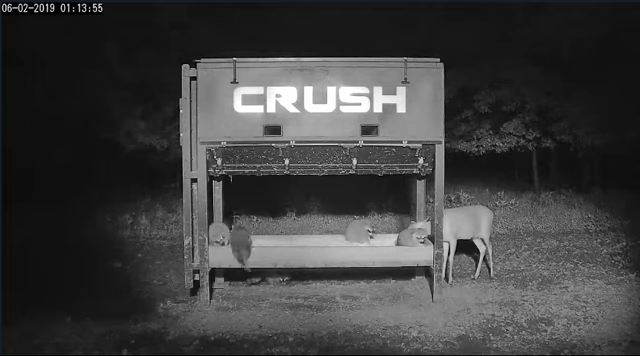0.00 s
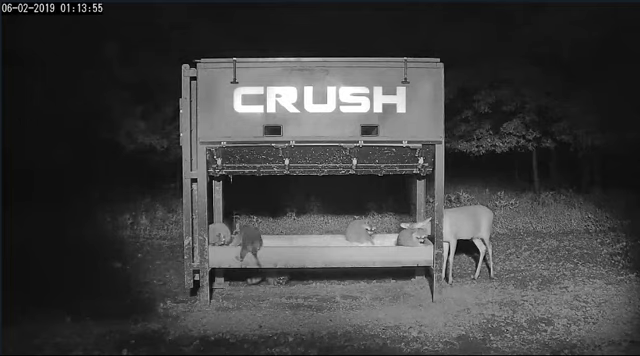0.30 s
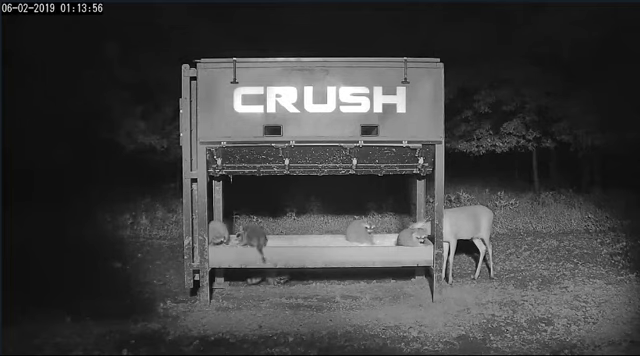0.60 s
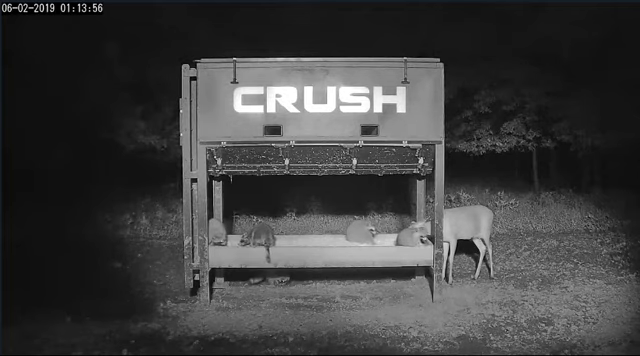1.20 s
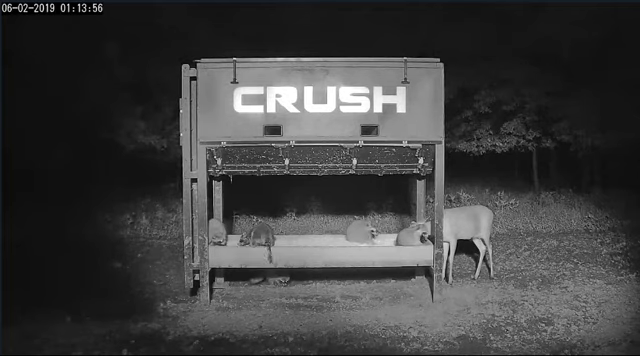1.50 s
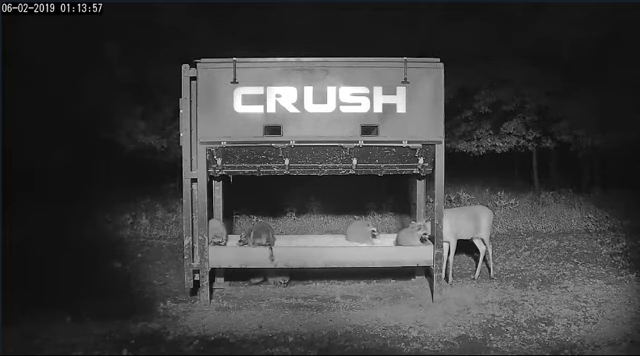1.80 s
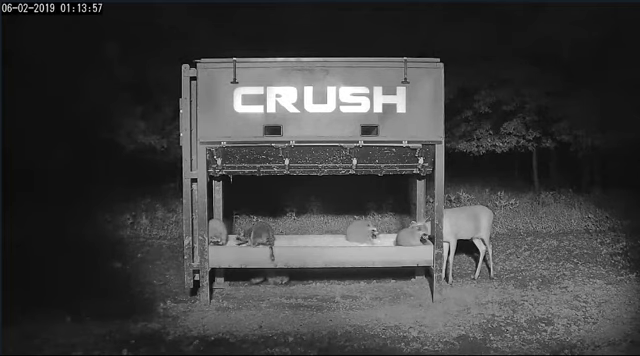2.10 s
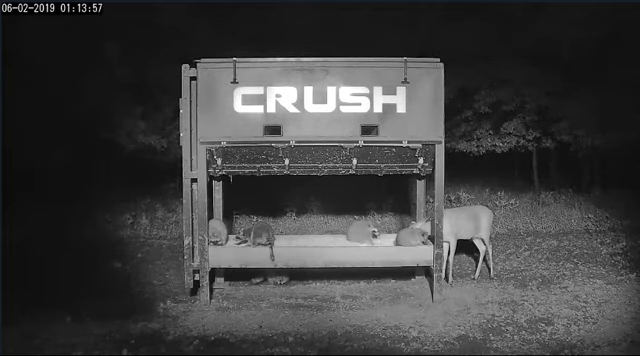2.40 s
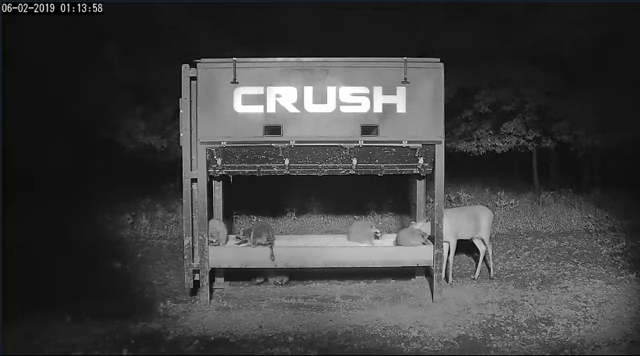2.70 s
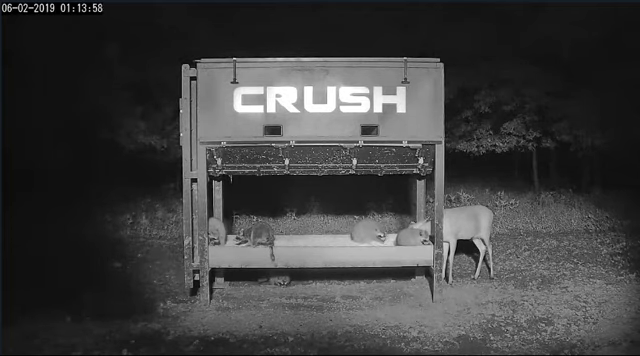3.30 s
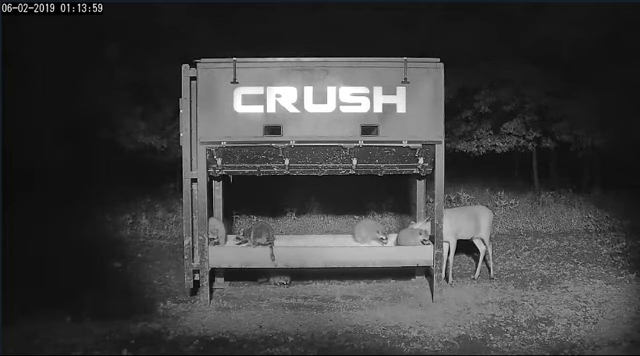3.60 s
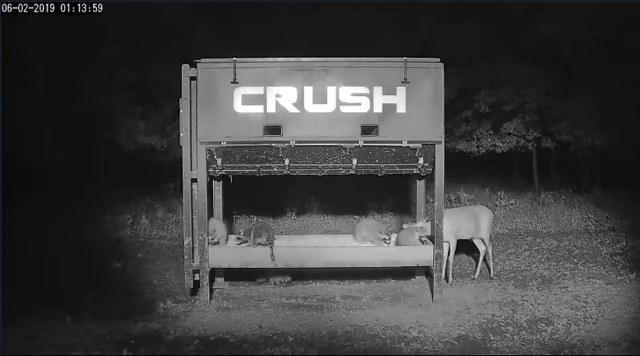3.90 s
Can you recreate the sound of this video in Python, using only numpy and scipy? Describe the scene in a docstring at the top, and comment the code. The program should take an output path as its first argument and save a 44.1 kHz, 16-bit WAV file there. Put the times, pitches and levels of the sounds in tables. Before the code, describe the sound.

Raccoons snarl and chatter in a metal feed trough, with rustling feed and light knocks.

```python
"""Raccoons snarl and chatter in a metal feed trough at night. Rough throat pulses and breath drive the
snarls; short puffs with a falling squeak make the grunts. Paws stir the feed, and claws and kernels
knock on the trough. Voices and knocks echo under the feeder's roof, over a faint steady hiss.
Heard through a small outdoor camera whose microphone rings near 3 kHz."""
import sys
import numpy as np
from scipy import signal
from scipy.fft import rfft, irfft, next_fast_len
from scipy.io import wavfile
from scipy.ndimage import uniform_filter1d

SR = 44100
rng = np.random.default_rng(int(sys.argv[2]) if len(sys.argv) > 2 else 0)


def to_wav(s):
    """Save 16-bit WAV."""
    ch = np.atleast_2d(s).T  # columns
    pcm = np.round(np.clip(ch, -1, 1) * 32767)  # PCM
    wavfile.write(sys.argv[1], SR, pcm.astype(np.int16))


N = 176400

# Paws stirring the feed. Each row: time in seconds, level in dB.
STIR_LEVELS = [(0, -33), (.2, -35.5), (.24, -32.5), (.38, -33.5), (.49, -26.5), (.55, -30.5), (.63, -31.5),
               (.87, -39.5), (.97, -39), (1.03, -37), (1.28, -36), (1.325, -48), (1.4, -40), (1.46, -44.5),
               (1.58, -45.5), (1.7, -49), (1.73, -42.5), (1.77, -42.5), (1.9, -40.5), (1.99, -37),
               (2.07, -32.5), (2.11, -31), (2.165, -37.5), (2.205, -45), (2.46, -51), (2.64, -41),
               (2.8, -40.5), (2.86, -37), (3.0, -34.5), (3.11, -32.5), (3.24, -29.5), (3.3, -34),
               (3.36, -45), (3.44, -44), (3.475, -42), (3.52, -47.5), (3.69, -45.5), (3.9, -50.5), (4, -49)]
# Snarls. Each row: start, peak and end in seconds; swell, sag, rasp, throat and hiss in dB;
# rasp centre in Hz, its lift in dB; upper lift and nasal level in dB; throat centre in Hz;
# pulses per second; breathiness 0-1; throat lift in dB; hiss centre in Hz, its lift in dB;
# whine in Hz, its lift in dB; chest resonance in Hz; lift of the valley above the throat in dB.
SNARL_EVENTS = [(0.019, 0.088, 0.16, 11, 6.5, -9.5, -33, -54.5, 3110, 16, 3.5, -37, 1020, 210, 0.28, 14.5, 4550, -1, 2954, 2, 376, -3),
                (0.253, 0.322, 0.362, 8.5, 7, -20.5, -37.5, -45, 3340, 6.5, 2.5, -41, 1050, 158, 0.65, -2, 8600, 13, 2800, 5, 295, 1.5),
                (0.422, 0.428, 0.51, 1, 3.5, -20.5, -40, -50, 3230, 10, 1, -61, 1120, 172, 0.59, 5, 7800, 10, 2340, 9.5, 543, 4.5),
                (0.622, 0.64, .72, -4.5, 0.5, -28.5, -52, -53.5, 2250, 9, 7.5, -62, 1000, 160, 0.95, 10, 6280, 21, 2760, 9, 500, -3),
                (0.718, 0.784, 0.8483, 12, 7, -17, -26.5, -57.5, 3020, 12.5, 8, -48, 900, 156, 0.94, 13.5, 5900, -5, 2627, 8, 698, 5),
                (1.482, 1.499, 1.65, 2, 29, -37.5, -37.5, -68, 2410, 11, -30, -56, 960, 111, 0.57, 7.5, 5800, 0, 2720, 1, 496, 1),
                (1.606, 1.666, 1.75, -1.5, 11, -44, -47.5, -73, 2440, 1, -1, -60, 930, 114, 0.83, 4.5, 5800, 0, 2320, 6, 506, 3),
                (1.782, 1.83, 1.955, 4.5, 0.5, -36.5, -45, -56.5, 3070, 12.5, 4, -65, 1020, 73, 0.98, 3, 4860, 30, 2770, 5, 328, 3),
                (2.959, 2.993, 3.035, 15, 4.5, -26, -40.5, -72, 2820, 20, 13.5, -70, 860, 170, 0.67, 6, 4900, 6, 2823, 10.5, 313, -12),
                (3.04, 3.042, 3.05, 3, 3, -28.5, -44, -62, 2770, 13, 14, -72, 840, 124, 0.56, 6, 4700, 7, 2640, 16, 600, -12),
                (3.167, 3.198, 3.183, 1, 0, -28.5, -38, -54, 2720, 4, 3.5, -80, 1010, 112, 0.69, 11, 5850, -5, 2840, 6, 328, -11)]
# Grunts. Each row: start and length in seconds, rasp and throat in dB, rasp centre in Hz,
# squeak share 0-1.
GRUNT_EVENTS = [(0.253, 0.0042, -20.5, -36.5, 3250, 0), (0.2954, 0.009, -20.5, -38, 3090, 0.6),
                (0.353, 0.014, -22.5, -58, 3925, 0.65), (0.3827, 0.0057, -17, -40.5, 3284, 0.6),
                (0.413, 0.0037, -21, -32.5, 2790, 0.7), (0.498, 0.0048, -19.5, -30, 2880, 0.8),
                (0.52, 0.0059, -12.5, -31, 3075, 1), (0.5267, 0.0064, -23.5, -51, 2410, 0.9),
                (.5395, 0.0028, -28, -30.5, 3070, 0.1), (0.5518, 0.0034, -15.5, -28, 3170, 1),
                (0.5635, 0.0058, -17, -43, 3070, 0.56), (0.583, 0.0082, -23, -32.5, 3120, 0),
                (0.605, 0.0088, -20, -37, 3047, 0.43), (0.617, 0.0028, -25, -45, 2490, 0.5),
                (0.796, 0.015, -23.5, -33, 3030, 0.8), (0.818, 0.011, -19, -34, 2770, 0.5),
                (0.852, 0.008, -21, -56, 3040, 1), (1.294, 0.015, -34.5, -40, 2935, 0.7),
                (2.809, 0.008, -30, -53, 2815, 0.6), (2.921, 0.015, -29.5, -49, 2850, 0.7),
                (3.068, 0.0082, -28.5, -33, 2630, .8), (3.201, 0.0076, -27, -35, 2770, 0.75),
                (3.227, 0.019, -32, -51, 2670, .5), (3.256, 0.011, -27.5, -36.5, 2870, 0.2),
                (3.288, 0.0045, -37, -49, 2700, 0.4)]
# Hits on the trough. Each row: start in seconds; tick, thud and crack in relative dB; ring in Hz,
# its lift in dB; scuff decay in seconds.
KNOCK_EVENTS = [(1.25, -25, -46, -53, 2820, 12, .001), (1.438, -15, -24.5, -51.5, 2910, 10, 0.0016),
                (1.708, -20.5, -38, -54, 2770, 16, 0.014), (2.053, -25.5, -61, -52, 2670, 8, 0.0016),
                (2.293, -30.5, -40.5, -47, 2930, -2, 0.0033), (2.531, -29.5, -47, -48.5, 3750, 16, 0.004),
                (2.761, -26, -40, -53, 2600, 12, 0.018), (2.923, -23, -56, -67, 2660, 22, 0.0012),
                (3.673, -27.5, -70, -49, 2860, 15, 0.00058), (3.68, -31, -68, -49, 3120, 13, 0.00061),
                (3.7124, -20.5, -41.5, -41, 2760, 15, 0.0023), (3.765, -39, -56, -54, 2800, 8, .001),
                (3.933, -28, -56, -59, 2500, 8, 0.0025), (3.953, -32.5, -49, -48, 2930, 1, 0.0041),
                (3.986, -32.5, -60, -66, 2600, 24, 0.002)]
# Spectra of the feed, background, voice and knocks. Each row: frequency in Hz, relative level in dB.
FEED_SPECTRUM = [(80, -48.5), (160, -30.5), (290, -11.5), (420, -23), (700, -20.5), (1000, -16.5),
                 (1200, -18.5), (1500, -26.5), (1900, -23), (2300, -5.5), (2750, -0.5), (3100, -3.5),
                 (3450, -1.5), (3950, -3), (4400, -14), (5200, -31.5), (5900, -28.5), (7500, -35),
                 (9500, -36), (11000, -48.5), (12500, -42), (16000, -45.5)]
NIGHT_SPECTRUM = [(24, -117), (40, -77), (179, -28), (245, -18), (311, -6), (410, -5), (567, -7), (700, -9),
                  (846, -13), (1400, -18.5), (1660, -13.5), (2080, -10.5), (2810, -3), (3030, -9.5),
                  (4090, -18.5), (5000, -28), (8890, -27.5), (10900, -35), (15800, -28)]
RASP_SPECTRUM = [(60, -56), (300, -47), (1300, -45.5), (1900, -17.5), (2250, -2.5), (2700, 0), (3200, 0.5),
                 (3500, -4), (4000, -1.5), (4400, -15), (5200, -31), (7000, -88)]
THROAT_SPECTRUM = [(70, -35.5), (140, -45.5), (200, -22), (290, 1), (410, -7), (600, -1), (1000, 2.5),
                   (1260, -1), (1420, -7), (1600, -13.5), (2200, -47), (4000, -47.5)]
HISS_SPECTRUM = [(60, -62.5), (400, -15), (2500, -19), (4500, 0.5), (5250, -7), (5750, 10.5), (6100, -5.5),
                 (6800, -1), (7500, -10.5), (8400, -13), (9600, -11), (11000, -27.5), (12500, -13.5),
                 (16000, -24.5)]
THUD_SPECTRUM = [(30, -40), (100, -53), (220, -23), (350, -4), (440, -3.5), (540, 2.5), (700, -5),
                 (900, 7.5), (1150, -6), (1500, -4), (3000, -9.5), (6000, -50)]
CRACK_SPECTRUM = [(60, -37), (600, -10), (4500, -0.5), (6500, 3.5), (9300, 2), (11000, -9), (13000, -12),
                  (16000, -11)]
# Resonances and notches of trough and housing. Each row: centre in Hz, width in Hz, lift in dB.
BODY_MODES = [(335, 29, 4.5), (502, 73, 10), (736, 40, 2.5), (879, 31, 3.5), (1013, 76, 6.5), (1240, 40, 2),
              (1400, 200, 4), (1730, 63, 1.5), (2294, 18, 3.5), (2427, 77, -5), (2606, 29, 7),
              (2779, 40, 3.5), (2950, 29, 2), (2930, 10, 7), (3180, 5.1, 0.5), (3387, 36, -6),
              (3623, 27, -2.5), (3736, 22, 5.5), (4025, 27, 2.5), (4960, 48, 3.5)]

RASP_WIDTH_HZ = 600


def from_db(db):
    """Decibels to gain."""
    return 10 ** (np.asarray(db) / 20)


def unit_rms(x):
    """Scale to rms 1."""
    return x / np.sqrt(np.mean(x ** 2) + 1e-20)


def coloured(x, spectrum, peaks=()):
    """Minimum-phase filter of unit power: a spectrum plus resonance peaks."""
    size = 2 * next_fast_len(len(x) // 2 + 2048)
    hz = np.arange(size // 2 + 1) * SR / size
    at_hz, db = np.transpose(spectrum)
    shape_db = np.interp(np.log(hz + 1), np.log(at_hz), db)
    for centre_hz, width_hz, lift_db in peaks:
        shape_db += lift_db / (1 + (2 * (hz - centre_hz) / width_hz) ** 2)
    cepstrum = irfft(np.log(unit_rms(from_db(shape_db))))
    cepstrum[1:size // 2] *= 2
    cepstrum[size // 2 + 1:] = 0
    return irfft(rfft(x, size) * np.exp(rfft(cepstrum)))[:len(x)]


def levelled(x, window):
    """Hold the running rms at 1; window in samples."""
    return x / np.sqrt(np.abs(uniform_filter1d(x * x, window)) + 1e-6)


def add(out, start_s, x):
    """Mix x into out."""
    i = max(0, int(start_s * SR))
    out[i:i + len(x)] += x[:max(0, N - i)]


def stirred_feed(grains_per_s=5000, spread_db=0.5, flutter_db=1.6):
    """Kernels rub and click as paws push through them."""
    times_s, levels_db = np.transpose(STIR_LEVELS)
    strengths = from_db(spread_db * np.minimum(rng.exponential(1, N), 5)) * rng.choice([-1, 1], N)
    grains = strengths * (rng.random(N) < grains_per_s / SR)
    flutter = unit_rms(uniform_filter1d(uniform_filter1d(rng.standard_normal(N), 600), 600))
    envelope = from_db(np.interp(np.arange(N) / SR, times_s, levels_db) + flutter_db * flutter)
    return envelope * unit_rms(coloured(grains, FEED_SPECTRUM, BODY_MODES))


def night_hiss(level_db=-49.5):
    """Steady background noise."""
    return from_db(level_db) * unit_rms(coloured(rng.standard_normal(N), NIGHT_SPECTRUM))


def rough_voice(rate_hz, breathiness, size, jitter=0.25, shimmer_db=4, puff_decay_cycles=0.73):
    """Throat pulses, each trailed by turbulent air; jitter and shimmer scale with breathiness."""
    period_draws, strength_draws = np.sqrt(breathiness) * rng.standard_normal((2, 160))
    starts_s = np.concatenate([[0], np.cumsum(np.exp(jitter * period_draws) / rate_hz)])
    phase = np.interp(np.arange(size) / SR, starts_s, np.arange(len(starts_s)))
    cycle = phase.astype(int)
    strength = from_db(shimmer_db * strength_draws)[cycle % len(strength_draws)]
    pulses = strength * np.diff(cycle, prepend=-1)
    puffs = strength * np.exp(-(phase % 1) / puff_decay_cycles) * rng.standard_normal(size)
    return np.sqrt(1 - breathiness) * unit_rms(pulses) + np.sqrt(breathiness) * unit_rms(puffs)


def soft_limit(x, crest_db=8.5):
    """Round off the strongest pulses of a voice at rms 1."""
    return x / (1 + (np.abs(signal.hilbert(x)) / from_db(crest_db)) ** 4) ** 0.25


def snarls(size=13000, attack_s=0.0017, release_s=0.0069, nasal_hz=1677, nasal_width_hz=113):
    """A rough voice swells and sags, driving a sharp rasp, throat resonance, nasal ring and hiss."""
    out, t = np.zeros(N), np.arange(size) / SR
    nose_band_hz = [nasal_hz - nasal_width_hz / 2, nasal_hz + nasal_width_hz / 2]
    nose = signal.butter(2, nose_band_hz, "band", fs=SR, output="sos")
    for (start_s, peak_s, end_s, swell_db, sag_db, rasp_db, throat_db, hiss_db, rasp_hz, rasp_lift_db,
         upper_db, nasal_db, throat_hz, rate_hz, breathiness, throat_lift_db, hiss_hz, hiss_lift_db,
         whine_hz, whine_db, chest_hz, valley_db) in SNARL_EVENTS:
        voice = rough_voice(rate_hz, breathiness, size)
        airy_voice = voice + 0.33 * rng.standard_normal(size)
        effort = from_db(np.interp(start_s + t, [start_s, peak_s, end_s], [-swell_db, 0, -sag_db]))
        effort *= np.minimum(t / attack_s, 1) * np.exp(-np.maximum(start_s + t - end_s, 0) / release_s)
        # Resonances, laid out as in BODY_MODES.
        mouth = [(rasp_hz, RASP_WIDTH_HZ, rasp_lift_db), (3880, 600, upper_db), (whine_hz, 74, whine_db)]
        gullet = [(chest_hz, 79, 10), (throat_hz, 500, throat_lift_db), (1410, 450, valley_db)]
        teeth = [(hiss_hz, 1100, hiss_lift_db), (1.47 * hiss_hz, 1100, 0.35 * hiss_lift_db)]
        rasp = levelled(coloured(voice, RASP_SPECTRUM, BODY_MODES + mouth), 700)
        rasp = from_db(rasp_db) * soft_limit(rasp)
        throat = from_db(throat_db) * levelled(coloured(voice, THROAT_SPECTRUM, BODY_MODES + gullet), 800)
        nasal = from_db(nasal_db) * levelled(signal.sosfilt(nose, voice), 1500)
        hiss = from_db(hiss_db) * levelled(coloured(airy_voice, HISS_SPECTRUM, teeth), 900)
        add(out, start_s, effort * (rasp + throat + nasal + hiss))
    return out


def grunts(size=2600, attack_s=0.0011, release_s=0.0016, squeak_fall_hz=240, spit_re_rasp_db=-34):
    """Short puffs through the same throat, with spit and a squeak that falls as it is pressed out."""
    out, t = np.zeros(N), np.arange(size) / SR
    for start_s, length_s, rasp_db, throat_db, rasp_hz, squeak_share in GRUNT_EVENTS:
        gate = np.minimum(t / attack_s, 1) * np.exp(-np.maximum(t - length_s, 0) / release_s)
        puff = gate * rng.standard_normal(size)
        rasp = unit_rms(coloured(puff, RASP_SPECTRUM, BODY_MODES + [(rasp_hz, RASP_WIDTH_HZ, 7)]))
        squeak_hz = rasp_hz - squeak_fall_hz * (np.minimum(t / length_s, 2) - 0.5)
        squeak = unit_rms(gate * np.sin(2 * np.pi * np.cumsum(squeak_hz) / SR))
        spit = from_db(spit_re_rasp_db) * unit_rms(coloured(puff, HISS_SPECTRUM))
        treble = np.sqrt(1 - squeak_share) * rasp + np.sqrt(squeak_share) * squeak + spit
        throat = unit_rms(coloured(puff, THROAT_SPECTRUM, BODY_MODES + [(920, 220, 11)]))
        gate_rms = np.sqrt(np.mean(gate ** 2))
        add(out, start_s, gate_rms * (from_db(rasp_db) * treble + from_db(throat_db) * throat))
    return out


def knocks(size=4000, gain=0.14, thump_hz=444, thump_decay_s=0.0056, thump_re_thud_db=-2):
    """Claws and kernels strike and scuff the trough: ringing tick, hollow thud, thin crack."""
    out, t = np.zeros(N), np.arange(size) / SR
    hollow_note = np.sin(2 * np.pi * thump_hz * t) * np.exp(-t / thump_decay_s)
    thump = from_db(thump_re_thud_db) * unit_rms(hollow_note)
    for start_s, tick_db, thud_db, crack_db, ring_hz, ring_db, scuff_s in KNOCK_EVENTS:
        contact = rng.standard_normal(size) * np.exp(-t / scuff_s)
        contact[0] += 6  # hard impact
        tick = from_db(tick_db) * unit_rms(coloured(contact, RASP_SPECTRUM, [(ring_hz, 380, ring_db)]))
        thud = from_db(thud_db) * unit_rms(unit_rms(coloured(contact, THUD_SPECTRUM)) + thump)
        crack = from_db(crack_db) * unit_rms(coloured(contact, CRACK_SPECTRUM))
        add(out, start_s, gain * (tick + thud + crack))
    return out


def roof_echo(x, size=9000, segments=16, level_db=-8, t60_s=0.19, delay_s=0.004):
    """Dense reflections between trough and roof; the pattern changes as the animals move."""
    out, t = np.zeros(N), np.arange(size) / SR
    hop = N // segments + 1
    for k in range(segments + 1):
        first = max(0, (k - 1) * hop)
        part = x[first:(k + 1) * hop]
        crossfade = np.cos(np.pi / 2 * ((first + np.arange(len(part))) / hop - k))
        tail = rng.standard_normal(size) * from_db(-60 * t / t60_s) * (t > delay_s)
        add(out, first / SR, signal.fftconvolve(part * crossfade, tail / np.linalg.norm(tail)))
    return from_db(level_db) * out


def scene():
    """Voices, knocks and their echo over feed and night hiss; mono."""
    snarl, grunt, knock = snarls(), grunts(), knocks()
    echo = roof_echo(snarl + from_db(-2) * grunt + from_db(-0.5) * knock)
    return (snarl + grunt + knock + echo + stirred_feed() + night_hiss())[None]


def record(dry, low_cut_hz=140, high_cut_hz=15850, ceiling=0.97):
    """Small microphone: bass cut, peaks clipped, top cut."""
    thin = signal.sosfilt(signal.butter(2, low_cut_hz, "high", fs=SR, output="sos"), dry)
    lowpass = signal.ellip(12, 0.1, 80, high_cut_hz, fs=SR, output="sos")
    return signal.sosfilt(lowpass, np.clip(thin, -ceiling, ceiling))


dry = scene()
out = record(dry)
to_wav(out)
```